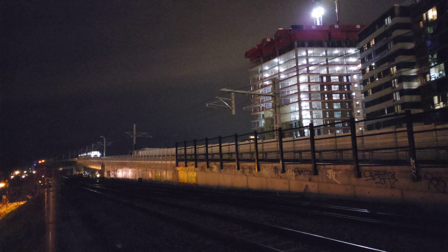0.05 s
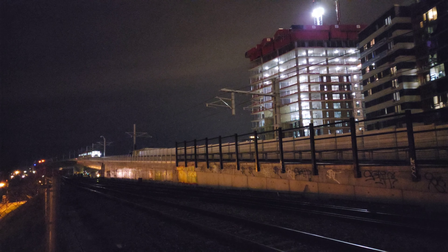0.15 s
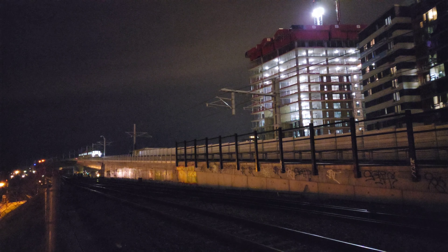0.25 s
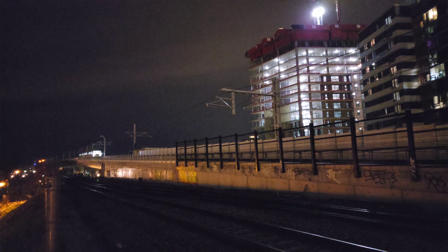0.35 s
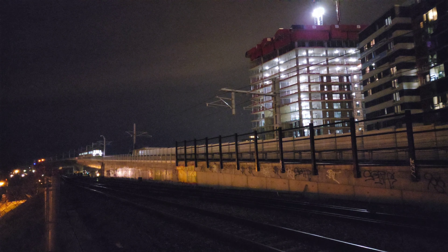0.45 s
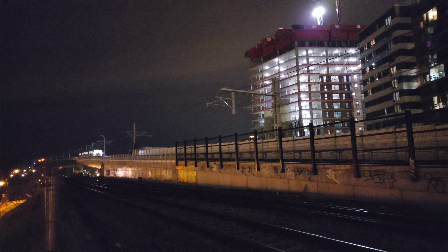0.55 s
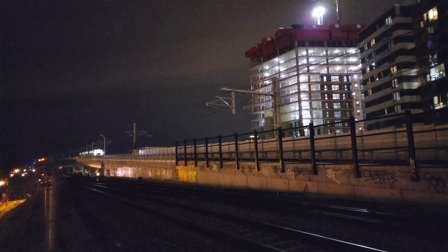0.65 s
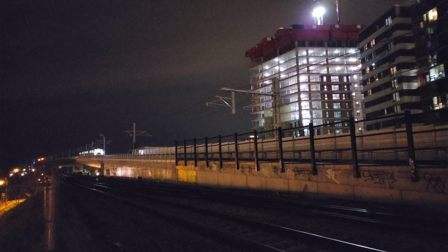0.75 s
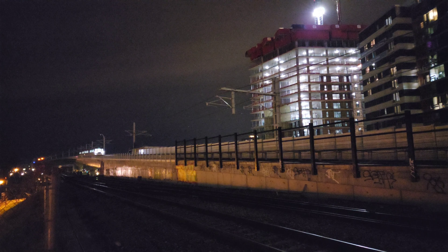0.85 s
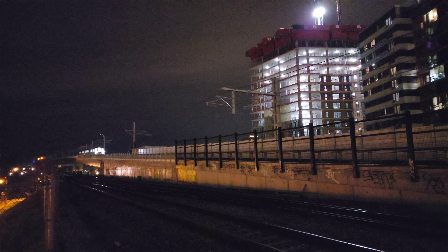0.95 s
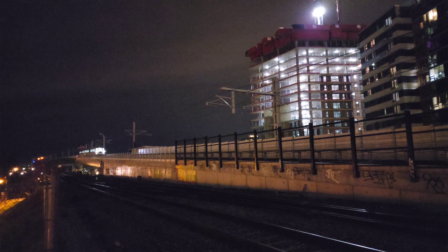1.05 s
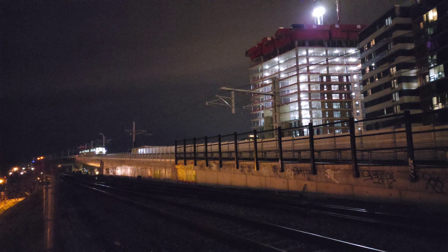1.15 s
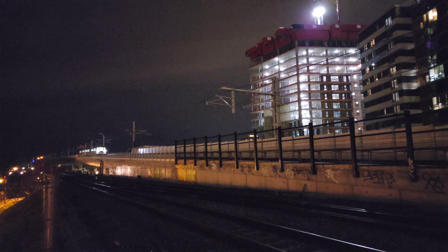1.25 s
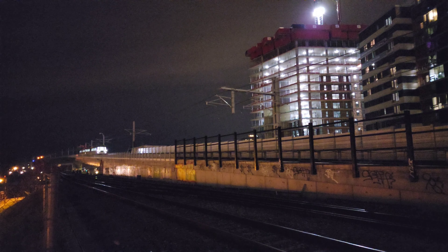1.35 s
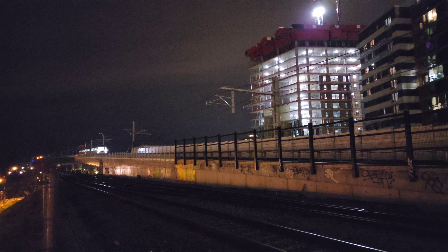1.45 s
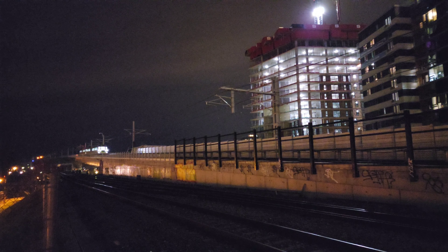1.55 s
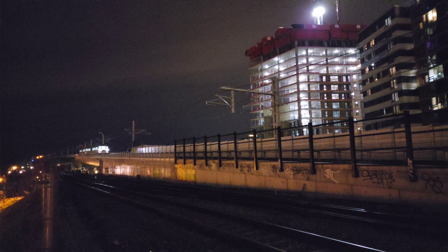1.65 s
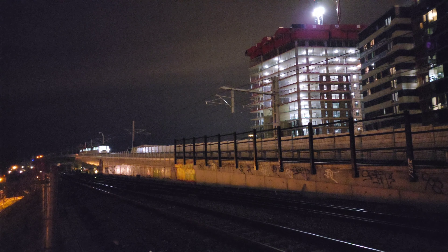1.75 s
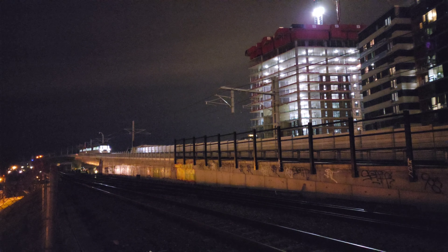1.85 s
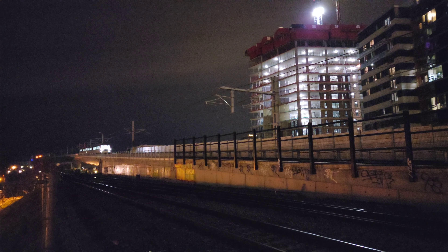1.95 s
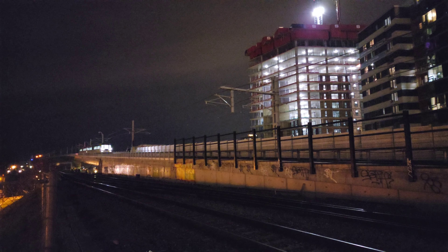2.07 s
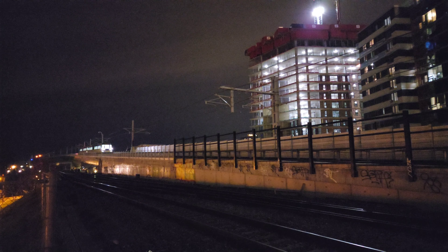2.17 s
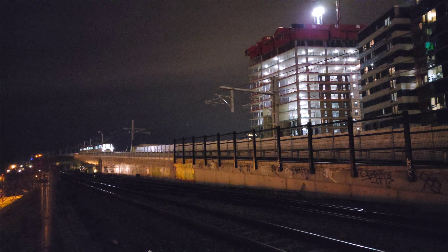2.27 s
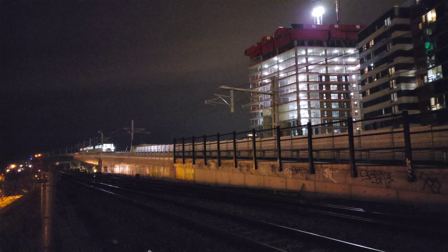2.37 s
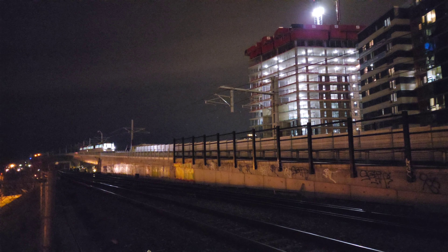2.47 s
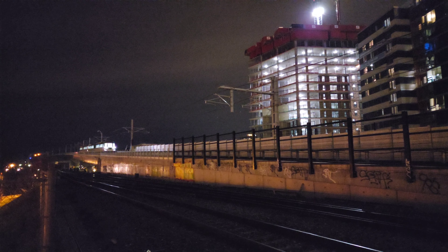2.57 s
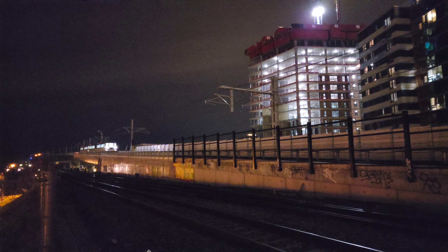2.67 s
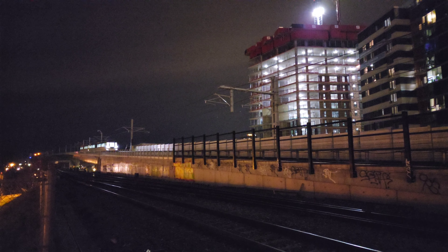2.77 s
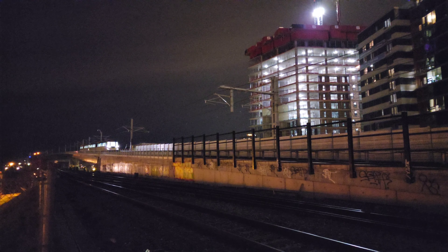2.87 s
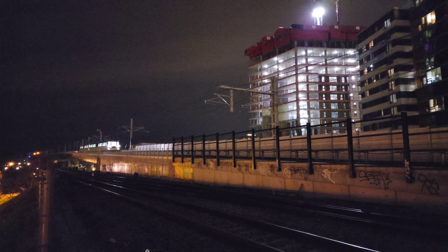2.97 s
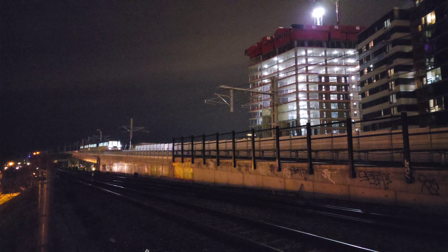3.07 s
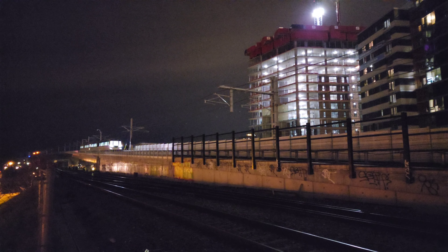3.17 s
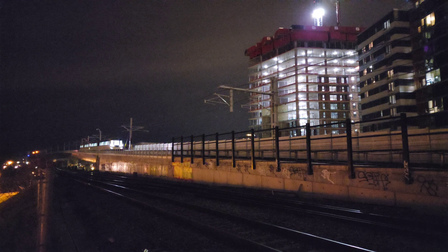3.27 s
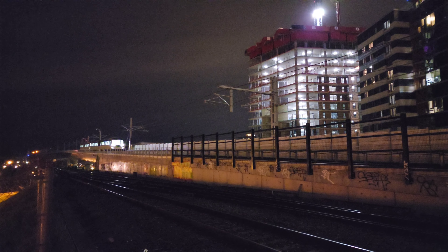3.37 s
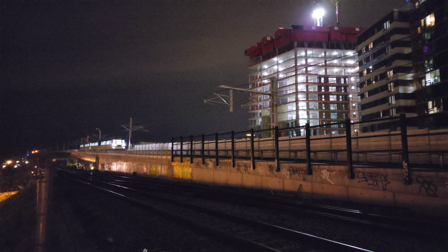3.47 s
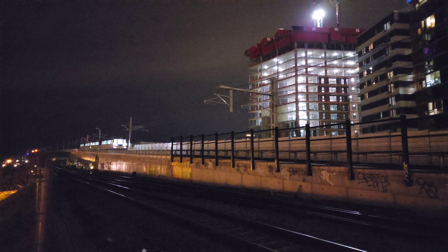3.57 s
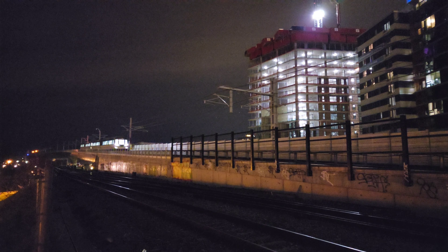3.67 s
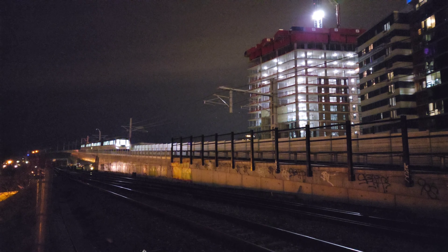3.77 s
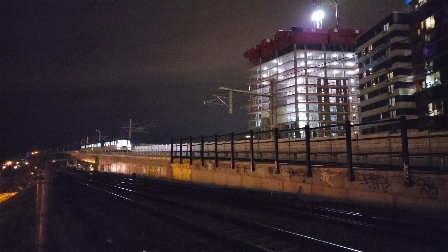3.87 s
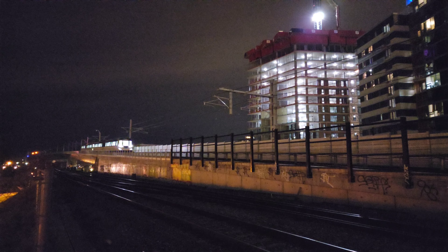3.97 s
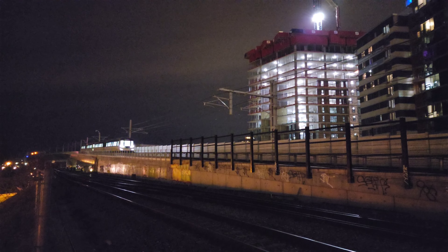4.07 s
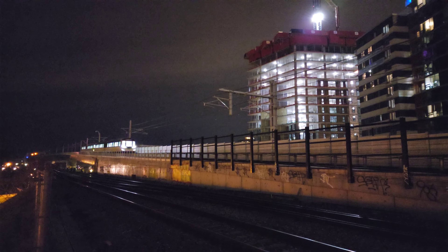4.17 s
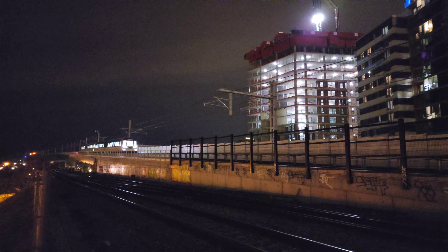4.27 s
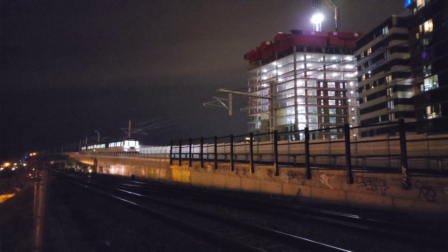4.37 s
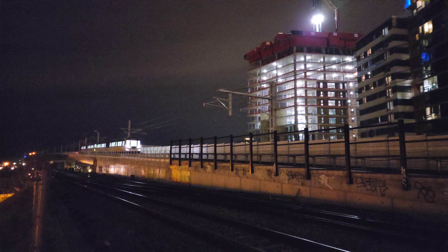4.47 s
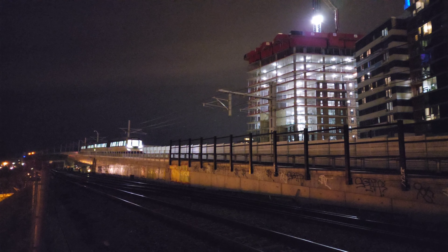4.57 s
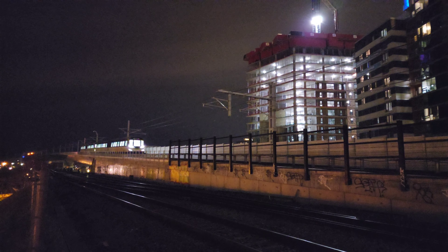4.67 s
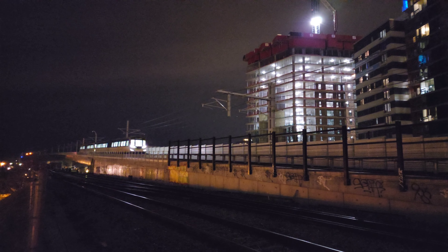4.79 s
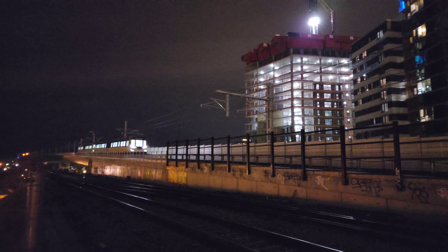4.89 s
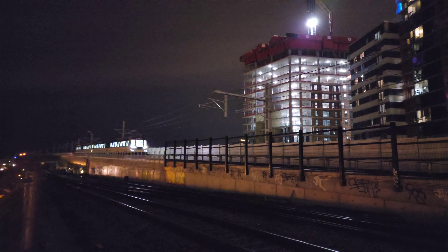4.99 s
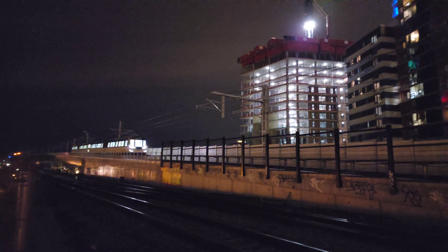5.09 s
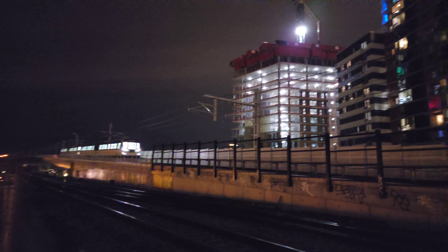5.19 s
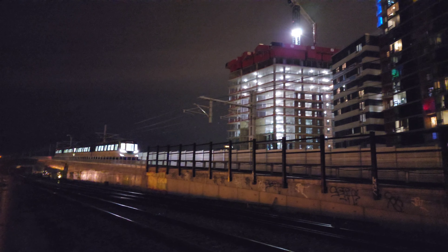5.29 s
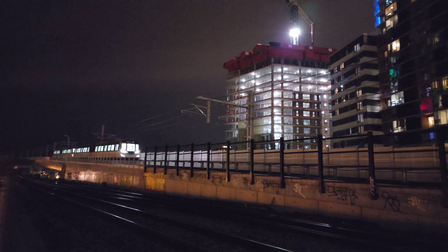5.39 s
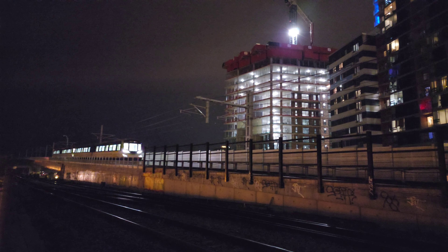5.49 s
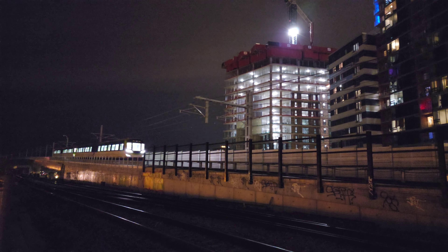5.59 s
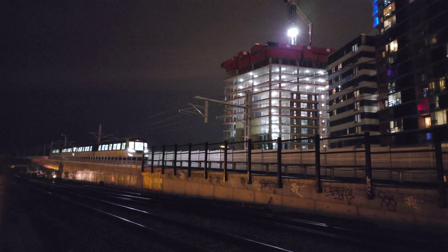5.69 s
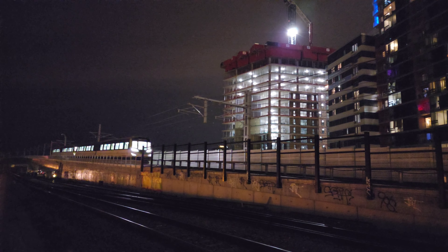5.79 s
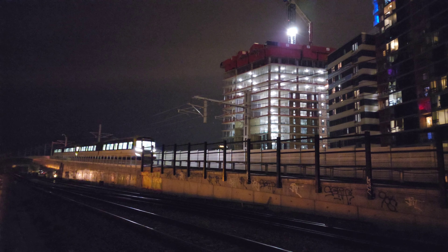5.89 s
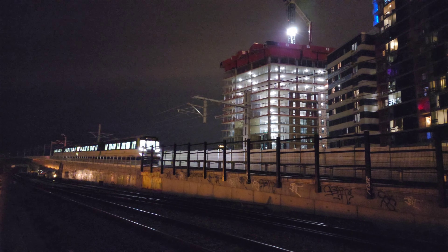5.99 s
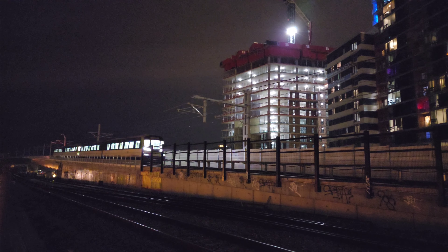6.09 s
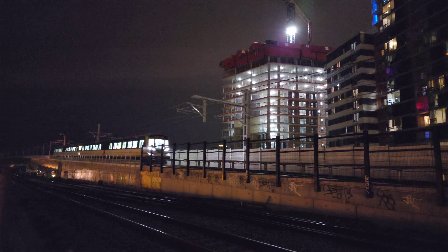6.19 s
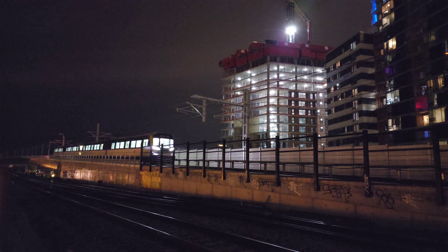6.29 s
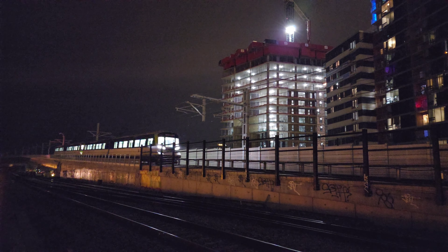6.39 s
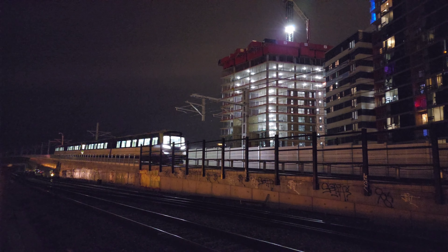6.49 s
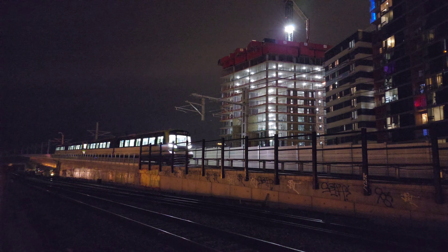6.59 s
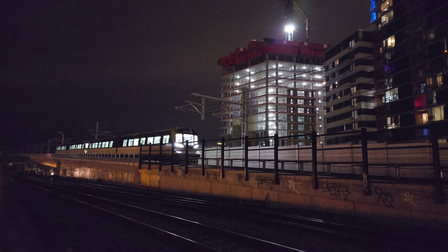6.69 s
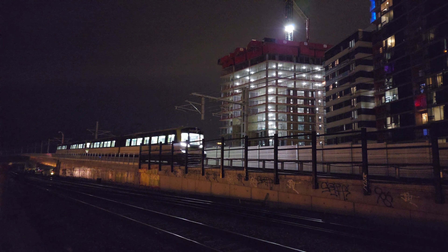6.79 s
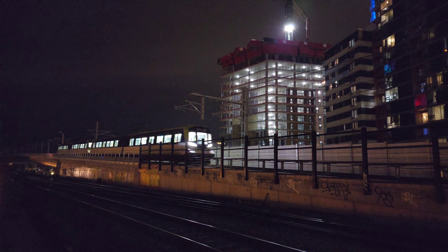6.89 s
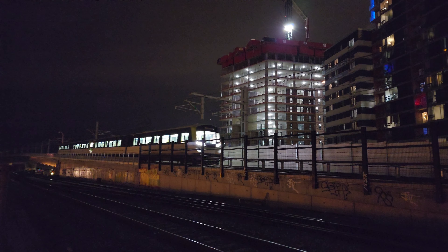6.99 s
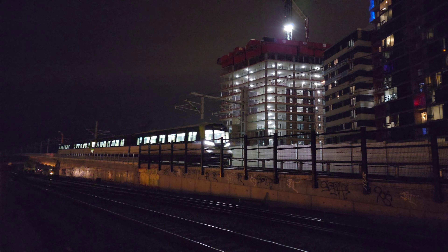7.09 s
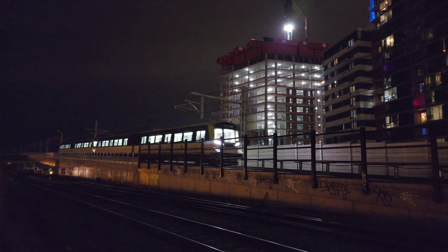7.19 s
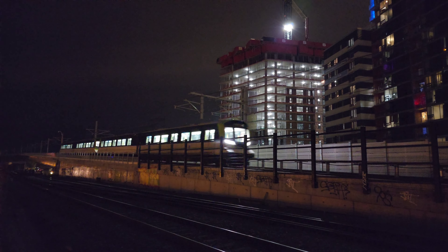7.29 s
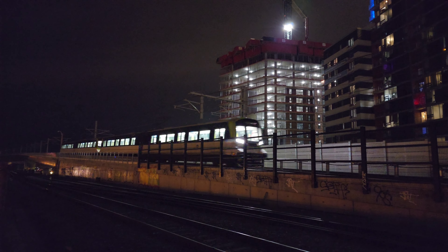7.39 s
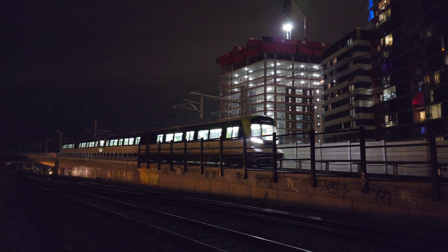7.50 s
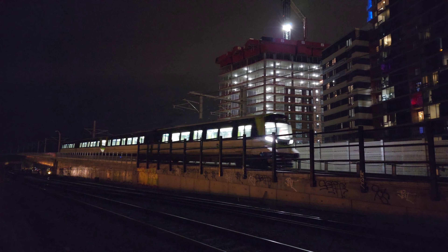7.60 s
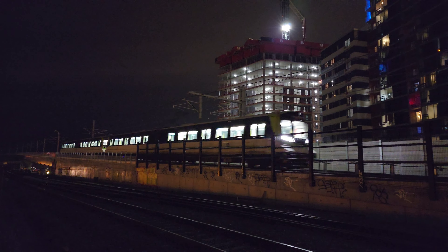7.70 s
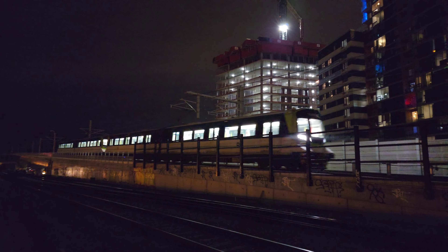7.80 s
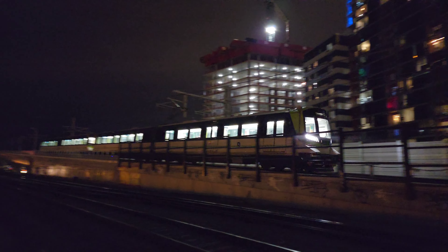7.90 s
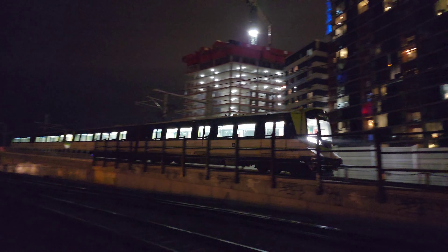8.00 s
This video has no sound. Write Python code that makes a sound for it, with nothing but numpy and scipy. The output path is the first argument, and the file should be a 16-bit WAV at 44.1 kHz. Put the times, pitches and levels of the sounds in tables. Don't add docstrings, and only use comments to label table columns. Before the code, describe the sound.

Low distant traffic rumble and muffled rail roar, faintly singing rails, then an electric train comes into the open, louder, clearer and whining.

```python
import sys
import numpy as np
from scipy import signal
from scipy.fft import rfft, irfft, next_fast_len
from scipy.io import wavfile

SR = 44100
rng = np.random.default_rng(int(sys.argv[2]) if len(sys.argv) > 2 else 0)


def master_out(mix):
    frames = np.transpose(np.atleast_2d(mix))
    ceiling = np.clip(frames, -1, 1)
    pcm = np.round(ceiling * 32767).astype(np.int16)
    wavfile.write(sys.argv[1], SR, pcm)


def amplitude_ratio(level_db):
    exponent = np.asarray(level_db, float) / 20
    return 10 ** exponent


N = 355005
SIZE = next_fast_len(N)
HZ = np.arange(1, SIZE // 2 + 2) * SR / SIZE
T = np.arange(N) / SR

APPROACH_HZ = [600, 1800, 3300, 7600, 11000]
# (time [s], share heard in the open [0-1])
OPEN_SHARE = [
    (0, 0.01),
    (4.3, 0.04),
    (4.7, 0.61),
    (5.5, 0.95),
    (8.05, 1),
]
# (time [s], level [dB])
ROAR = [(0, -30.5), (1, -31), (2.1, -30), (2.5, -29), (2.8, -30), (3.2, -31), (3.8, -30), (4.2, -30),
        (4.7, -27.5), (5.6, -26), (5.9, -26), (6.4, -24), (6.9, -23.5), (7.35, -22), (7.7, -20),
        (8.05, -19.5)]
# (time [s], rms level [dB])
RAIL_SWELL = [
    (0, -108),
    (2.2, -95.5),
    (2.7, -82.5),
    (4, -72.5),
    (5.3, -75),
    (6, -82),
    (8.05, -91.5),
]
# (frequency [Hz], likeness [0-1], left lead [rad], left minus right [dB])
PAIR_SCREENED = [(120, .98, -.14, -1), (300, .79, -.1, -1.4), (560, .69, .77, -.9), (750, .47, 1.9, 2.5),
                 (1100, .43, 2.6, 2.1), (1400, .62, 3.6, 1.7), (1680, .4, 3.9, -.7), (2000, .62, 5.6, 0),
                 (2350, .4, 6.1, 1.6), (2800, .47, 9.1, 1.9), (4500, .4, 8.3, -1.5), (5400, .34, 6.8, -1.2),
                 (6600, .25, 4.5, 4), (13500, .05, 4.5, 8)]
PAIR_IN_VIEW = [(300, .84, 0, -1.6), (430, .88, .37, .35), (560, .75, .15, -2), (750, .38, .33, .7),
                (1100, .2, 2.2, .6), (1400, .61, 3.9, -1.3), (1680, .49, 4.6, -6), (2000, .73, 6.4, -1),
                (2350, .48, 6.1, .6), (2800, .3, 4.8, 2.8), (4500, .2, 3, -5.5), (6500, .1, 3, 1.5),
                (10000, .15, 3, -1.1), (12500, .1, 3, 6)]


def train():
    # (frequency [Hz], density [dB])
    screened_colour = [(180, -68), (330, -61.5), (570, -60.5), (880, -63), (1100, -68), (1550, -71),
                       (2250, -78), (2650, -89.5), (3750, -96.5), (4250, -109), (5800, -115),
                       (8800, -124.5), (9800, -137), (15500, -151)]
    in_view_colour = [(180, -63.5), (330, -55.5), (570, -51.5), (880, -53), (1100, -60), (1580, -62),
                      (2250, -65.5), (2650, -77), (3750, -79.5), (4100, -82), (5400, -87), (9000, -99.5),
                      (11100, -109), (15500, -126)]
    levels = approach()
    share = np.clip(in_time(OPEN_SHARE), 0, 1)
    screened = rolling(screened_colour, (1, 3.5), ring_column=2, pair=PAIR_SCREENED, levels=levels)
    in_view = rolling(in_view_colour, (6, 7.9), ring_column=3, pair=PAIR_IN_VIEW, levels=levels)
    lines = rfft(np.sqrt(1 - share) * screened + np.sqrt(share) * in_view, SIZE)

    centres = np.log(np.geomspace(300, 13000, 17))
    together = drift(5.)
    patchy_db = 0.5
    out = 0
    for k, centre in enumerate(centres):
        band = np.interp(np.log(HZ), centres, np.arange(len(centres)) == k)
        weights = [np.interp(centre, np.log(APPROACH_HZ), row) for row in np.eye(len(levels))]
        flicker_db = patchy_db * (0.52 * together + drift(9.))
        out = out + amplitude_ratio(weights @ levels + flicker_db) * irfft(lines * band, SIZE)[:, :N]
    return out


def rolling(colour, span_s, ring_column, pair, levels):
    # (frequency [Hz], width [Hz], screened [dB over rolling noise], in view [dB])
    rings = [(432, 40, 8, 9), (468, 45, 9, 7), (705, 90, 9.5, 8.5), (780, 80, 3, 4), (1250, 70, 0, 4),
             (1337, 16, 3, 8), (1410, 30, 3, 4), (1650, 22, 4, 6), (1730, 60, 4, 6), (1890, 70, 1, 5),
             (1976, 45, 5, 5), (2235, 45, 3, 4), (2310, 60, 1, 5), (2902, 40, 1, 3), (3338, 90, 4, 4),
             (3760, 120, 1, 3), (4850, 450, 5, 2), (6350, 500, 0, 4), (8500, 200, 0, 0), (10400, 140, 0, 8)]
    power = 1
    for ring in rings:
        height = amplitude_ratio(2 * max(ring[ring_column], 0)) - 1
        power = power + height * peak(ring[0], ring[1], slope=1.72)
    start, end = (int(s * SR) for s in span_s)
    span_db = levels[:, start:end].mean(axis=1)
    level_db = at_hz(colour)[0] - at_hz(np.transpose([APPROACH_HZ, span_db]))[0]
    low_cut = 1 / np.sqrt(1 + (216.0 / HZ) ** 4)
    return pair_noise(amplitude_ratio(level_db) * np.sqrt(power) * low_cut, pair)


def approach():
    # (share of the roar's swell [1], air and ground loss [dB per 100 m],
    # parapet loss [dB], loss behind the bend [dB])
    path = [(1, 1.3, -4.6, 2.1), (.55, 4.5, 1, 2.8), (.55, 13, -2.5, -1.2), (0.48, 16, 3.5, 10.5),
            (0.32, 26, 1, 6.5)]
    start_m, speed_m_per_s = 200, 21
    bend_s, bend_takes_s = 2.2, 0.54
    roar_db = in_time(ROAR)[0]
    screened = 1 - np.clip(in_time(OPEN_SHARE)[0], 0, 1)
    metres = start_m - speed_m_per_s * T
    hidden = np.clip(1 - (T - bend_s) / bend_takes_s, 0, 1)
    bands = []
    for follows, loss_db, parapet_db, bend_db in path:
        shadow_db = parapet_db * screened + bend_db * hidden
        bands.append(follows * roar_db - loss_db * metres / 100 - shadow_db)
    return np.array(bands)


def rail_song():
    # (frequency [Hz], width [Hz], level [dB])
    rail_modes = [(4750, 200, -4), (6230, 160, -2), (6450, 700, -9), (6680, 110, 0)]
    power = sum(amplitude_ratio(2 * db) * peak(hz, width, slope=2) for hz, width, db in rail_modes)
    return steady(np.sqrt(power), PAIR_SCREENED, in_time(RAIL_SWELL))


def drive():
    # (multiple of the slot rate [1], rms level [dB], left minus right [dB])
    harmonics = [(8, -70, 0), (10, -73, -4), (12, -79, 0), (16, -81, 0), (17, -82, 0), (18, -87, 0),
                 (19, -87, 0)]
    # (time [s], level [dB])
    whine_swell = [
        (0, -47),
        (5.5, -24.5),
        (6.5, -33.5),
        (7, 2.5),
        (7.6, 4.5),
        (8.05, 7),
    ]
    slot_hz = 467.75
    phase = 2 * np.pi * slot_hz * np.cumsum(1 + .0008 * drift(6.)) / SR
    out = 0
    for multiple, level_db, side_db in harmonics:
        start_phase = 2 * np.pi * rng.random() + rng.random((2, 1))
        tone = np.sqrt(2) * np.sin(round(multiple) * phase + start_phase)
        ear_db = side_db * np.array([[.5], [-.5]])
        out = out + tone * amplitude_ratio(level_db + 2.5 * drift(3.) + 3 + ear_db)
    return out * amplitude_ratio(in_time(whine_swell))


def top_hiss():
    # (frequency [Hz], density [dB per Hz])
    top_colour = [(9000, -42.5), (11100, -21.5), (11450, 3), (12600, 2.5), (13500, -1.5), (14300, 1.5),
                  (15700, -1)]
    end_db, follows, of_song_db = -60, 1.9, -13
    treble_db = approach()[3]
    rolling_db = end_db + follows * (treble_db - treble_db[-1])
    song_db = in_time(RAIL_SWELL)[0] + of_song_db
    level_db = 10 * np.log10(amplitude_ratio(2 * rolling_db) + amplitude_ratio(2 * song_db))
    top = steady(amplitude_ratio(at_hz(top_colour)[0]) * (HZ > 8000), PAIR_IN_VIEW, level_db)
    return top * amplitude_ratio(.7 * drift(12.))


def tick():
    # (frequency [Hz], level [dB], decay by 60 dB [s])
    body_modes = [(4000, 0, .014), (6200, -2, .014), (7950, 0, .016), (9500, -12, .009)]
    age = np.maximum(T - 2.2945, 0)
    rings = 0
    for hz, db, t60 in body_modes:
        rings = rings + amplitude_ratio(db - 60 * age / t60) * np.sin(2 * np.pi * hz * age)
    return rings * (1 - np.exp(-age / .0004)) * amplitude_ratio(-63)


def city():
    # (frequency [Hz], density [dB])
    city_colour = [(15, -43), (28, -1.5), (40, 8), (48, 12), (58, 15), (75, 13), (105, 11), (140, 5),
                   (200, 4), (300, -3), (450, -27)]
    # (frequency [Hz], likeness [0-1], left lead [rad], left minus right [dB])
    pair_city = [(40, .999, -.05, -.2), (120, .992, -.14, -1), (180, .96, -.14, -1.4),
                 (300, .79, -.1, -1.4)]
    city_db, waver_db = -37.5, 1.25
    deck_follows = 0.16
    bass_only = 1 / (1 + (HZ / 500) ** 8)
    roar_db = in_time(ROAR)[0]
    level_db = city_db + deck_follows * (roar_db - roar_db.mean()) + waver_db * drift(1.5)
    return steady(amplitude_ratio(at_hz(city_colour)[0]) * bass_only, pair_city, level_db)


def steady(gain, pair, level_db):
    noise = pair_noise(gain, pair)
    return noise / np.std(noise.mean(axis=0)) * amplitude_ratio(level_db)


def pair_noise(gain, pair):
    alike, lead, side_db = at_hz(pair)
    alike = np.clip(alike, 0, 1)
    ear = np.array([[.5], [-.5]])
    direct, *scattered = rfft(rng.standard_normal((3, SIZE))) * np.sqrt(SR / 2)
    direct_part = np.sqrt(alike) * direct * np.exp(1j * ear * lead)
    both = direct_part + np.sqrt(1 - alike) * np.array(scattered)
    return irfft(both * gain * amplitude_ratio(ear * side_db), SIZE)[:, :N]


def peak(hz, width, slope):
    return 1 / (1 + (2 * (HZ - hz) / width) ** 2) ** slope


def drift(rate):
    r = np.exp(-80 * np.pi * rate / SR)
    slow = signal.lfilter([1], [1, -2 * r, r * r], rng.standard_normal(N // 40 + 2002))[2000:]
    return np.interp(np.arange(N) / 40, np.arange(len(slow)), slow / np.std(slow))


def in_time(rows):
    s, *columns = np.transpose(rows)
    return np.array([np.interp(T, s, c) for c in columns])


def at_hz(rows):
    hz, *columns = np.transpose(rows)
    return [np.interp(np.log(HZ), np.log(hz), c) for c in columns]


def scene():
    return train() + rail_song() + drive() + tick() + city()


def top_cut(x):
    return signal.sosfilt(signal.butter(12, 15740, fs=SR, output="sos"), x)


def record(dry):
    self_noise = amplitude_ratio(-91.5) * rng.standard_normal(dry.shape)
    return top_cut(dry + top_hiss() + self_noise)


dry = scene()
out = record(dry)
master_out(out)
```